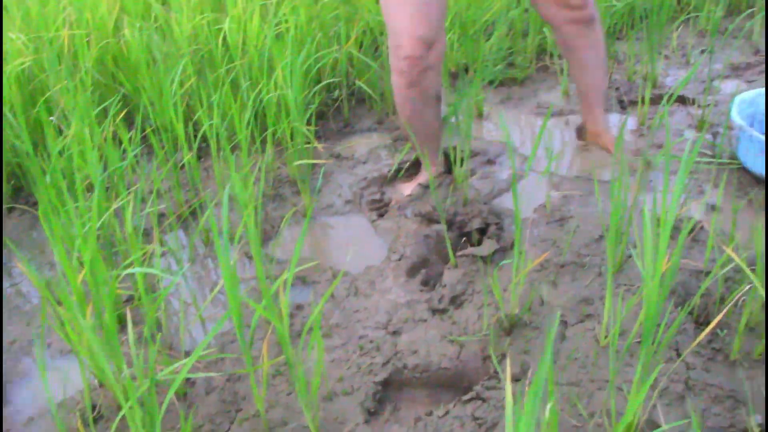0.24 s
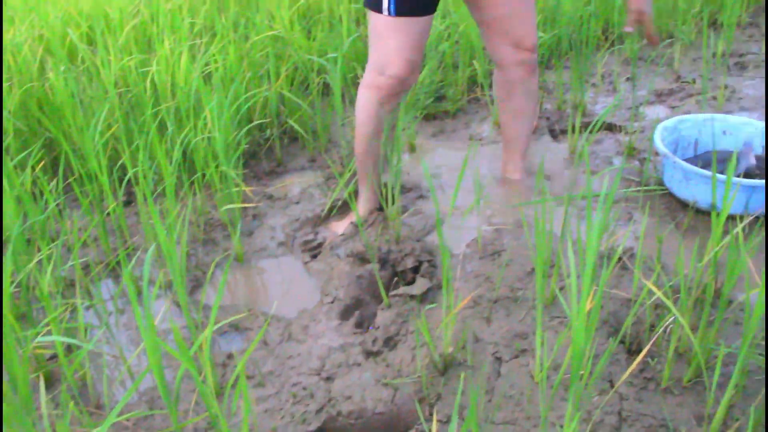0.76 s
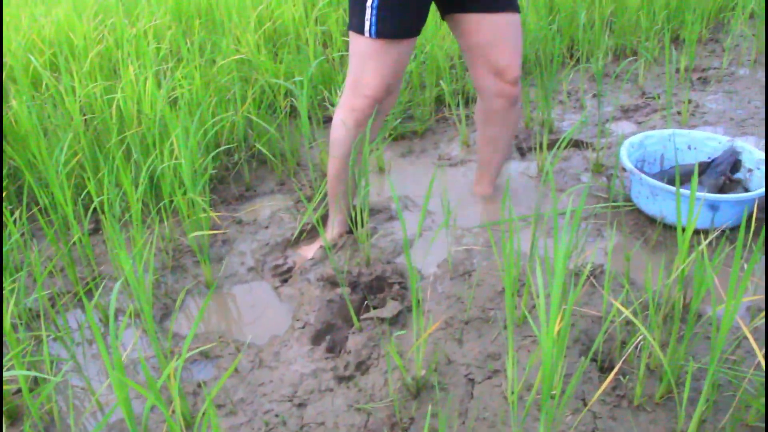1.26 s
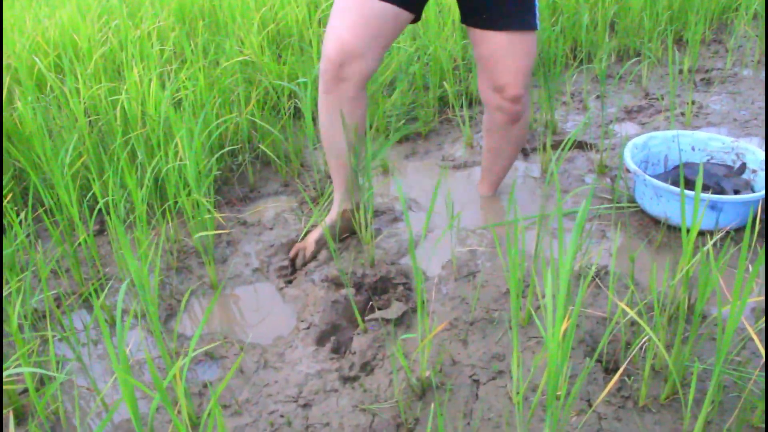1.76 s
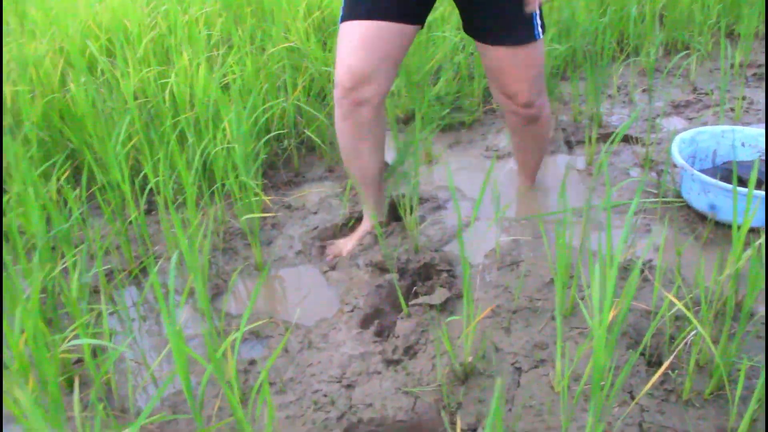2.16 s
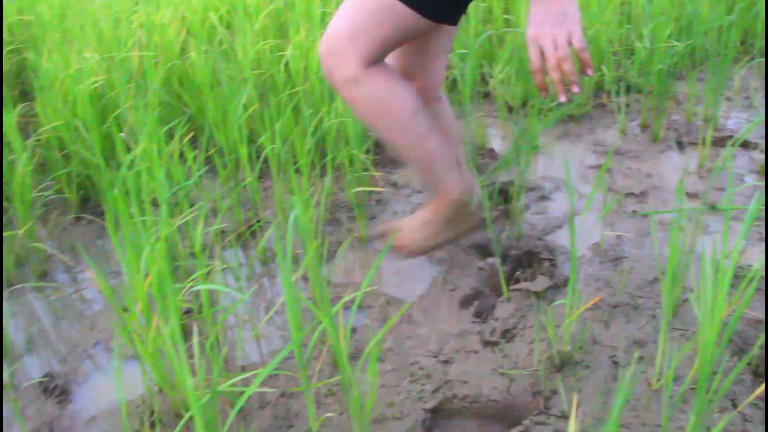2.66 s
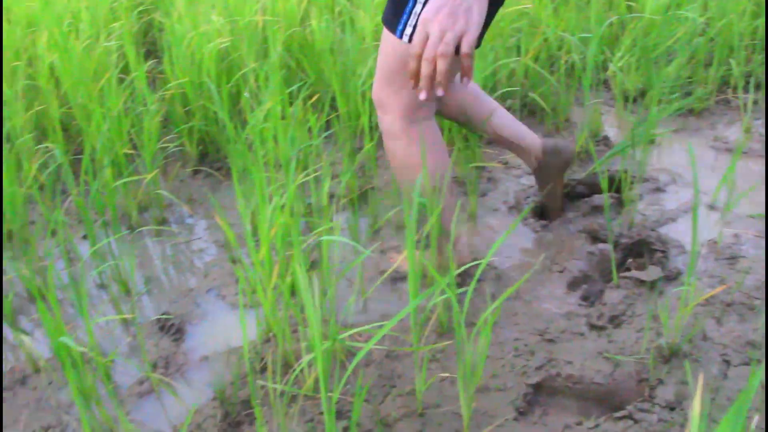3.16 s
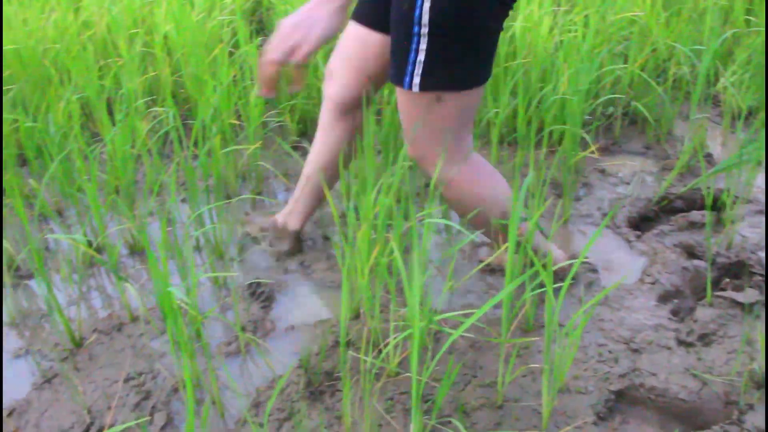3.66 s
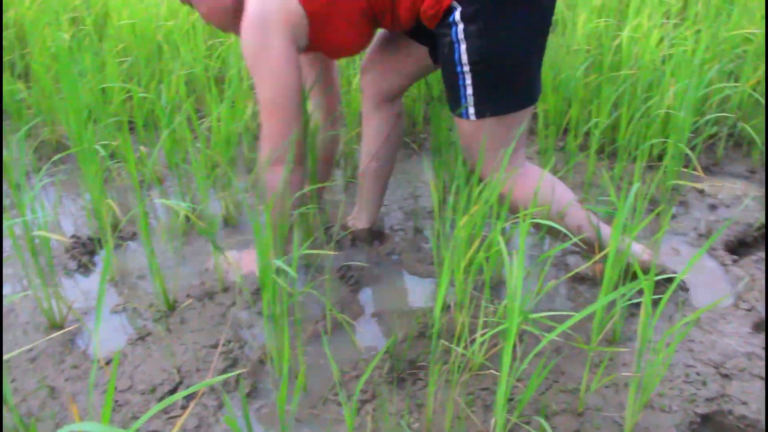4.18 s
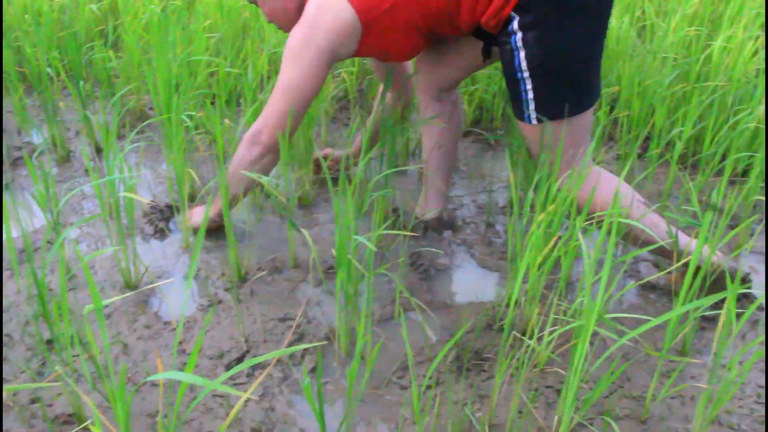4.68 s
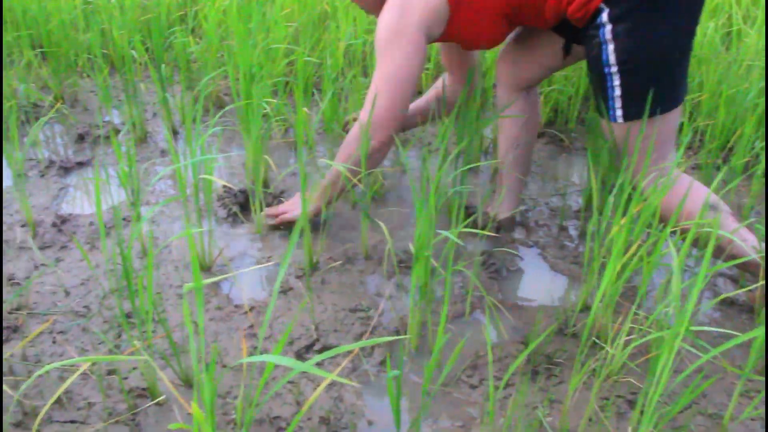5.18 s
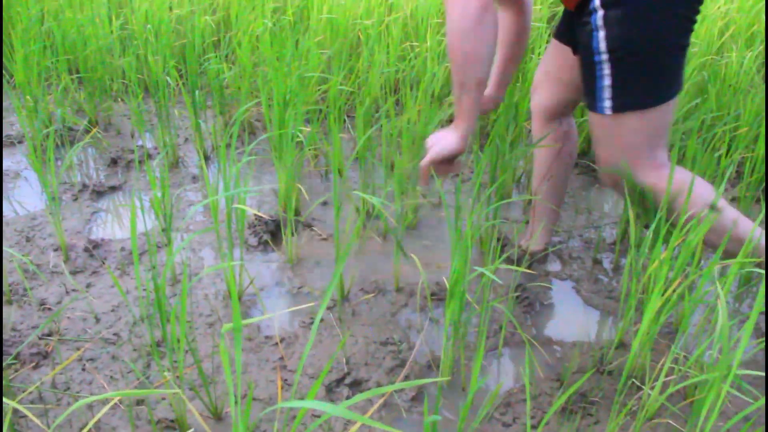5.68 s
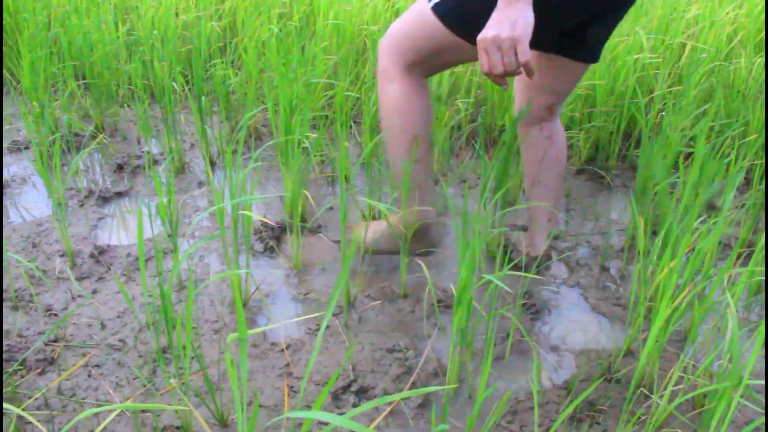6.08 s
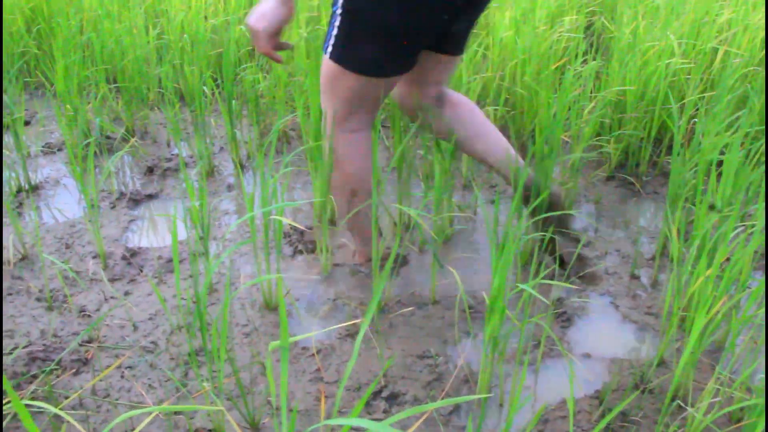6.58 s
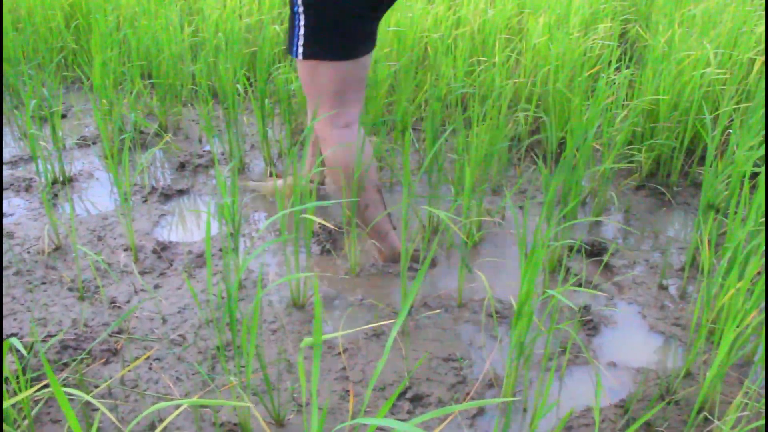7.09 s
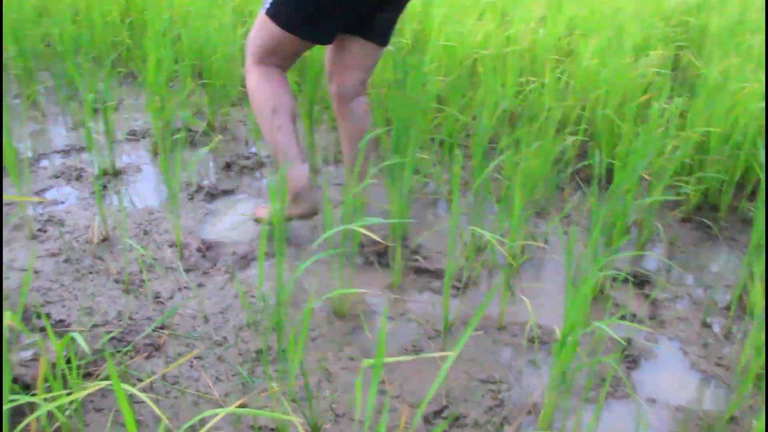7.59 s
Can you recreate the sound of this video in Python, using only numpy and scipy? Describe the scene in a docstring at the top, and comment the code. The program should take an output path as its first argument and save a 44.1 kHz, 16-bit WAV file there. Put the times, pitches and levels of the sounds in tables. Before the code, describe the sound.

Outdoors in a flooded field, irregular wet mud bursts, ringing bubbles and fine droplets follow each step and handful. Wet tearing clusters give way to quiet, a strong sucking pop, more quiet, then watery plops and sloshing. A quick squeaky air spurt precedes heavier splashing steps. The stereo pickup is close and dry, weighted right, over gentle rumble, hiss and sparse distant chirps.

```python
"""Wading in a flooded rice field

Someone wades barefoot, off to the right of the microphones, working the mud by hand: grain bursts squelch and tear.
Swelling swarms of ringing bubbles and snapping films slosh; single decaying tones make the larger pops and drips.
Late on, air squirts from under a foot as crackle through resonances, over two ringing pockets.
Far birds are raspy wavering tones with a blurred tail; the open air is coloured noise with a thin high whine."""
import sys
import numpy as np
from scipy import signal
from scipy.fft import rfft, irfft
from scipy.io import wavfile
from scipy.ndimage import uniform_filter1d

SR = 44100
rng = np.random.default_rng(int(sys.argv[2]) if len(sys.argv) > 2 else 0)


def waveform_to_disk(signal):
    """Save audio, clipped to [-1, 1], as 16-bit WAV at the path in sys.argv[1]."""
    frames = np.transpose(np.atleast_2d(signal))
    scaled = np.clip(frames, -1, 1) * 32767
    samples = np.round(scaled).astype(np.int16)
    wavfile.write(sys.argv[1], SR, samples)


N = 345744

# Levels of all water and mud sounds are taken before the common gain in field().
# Mud tearing or slapped [mid_swell_s, level_db, ring_t60_s, thud_db, spit_db]; squelches() offsets the last two
SQUELCH_EVENTS = [(.27, -31.5, .024, -14, 3), (.31, -42.5, 0.026, -17, 8), (.436, -38.5, 0.027, 5, -16),
                  (.68, -23.5, 0.025, 4.5, -9.5), (.762, -27, 0.015, 5, 3.5), (.828, -25.5, 0.06, 5.5, -4),
                  (0.851, -26, 0.067, 0, -6), (.89, -30, 0.018, 1, -25), (0.922, -39, .033, 9, -15),
                  (1.039, -33, .03, 3.5, -1.5), (1.086, -35, 0.026, -2, 5.5), (1.134, -42, 0.057, 13, -24),
                  (1.732, -45, 0.037, 11.5, -4), (1.862, -40.5, 0.03, 6, -13),
                  (2.065, -46, 0.045, 12.5, -4), (2.221, -37.5, 0.03, 13, 2), (2.237, -26, .016, 8, -10),
                  (2.253, -28, 0.02, 6, -8), (2.264, -29.5, .084, -1, -10), (2.3, -40.5, 0.017, -8, 6.5),
                  (2.3615, -16.5, 0.016, 8, -17.5), (2.505, -33, 0.041, -5, -20),
                  (2.552, -22, 0.02, -16, -12), (2.578, -29, 0.024, -4.5, -2.5),
                  (2.634, -31.5, 0.046, -2, -2.5), (2.706, -35, .027, -6, -6), (2.759, -40, .017, -16, 1.5),
                  (2.807, -43, 0.028, -14, 13), (2.826, -30.5, 0.067, -2, 1.5),
                  (2.888, -32.5, 0.068, -16, -8), (3.054, -45, 0.023, -12, 8), (3.737, -30, 0.049, -16, -3),
                  (3.753, -26, .027, -6.5, -25), (4.2127, -23.5, 0.02, -23, -7.5),
                  (4.229, -30.5, 0.019, -6, 1), (4.268, -22.5, .02, -16, -18),
                  (4.374, -36.5, 0.039, -11, 3.5), (4.776, -26.5, .023, -20, -2.5),
                  (4.7922, -27.5, .013, -30, 1), (4.941, -35, 0.027, -20, -25),
                  (4.968, -33, .03, -10, -1.5), (5.31, -29, 0.037, -1, -6), (5.325, -31, 0.038, -24, -1.5),
                  (5.383, -29, .032, -13, -9), (5.459, -33, 0.037, 5.5, -7), (6.012, -41.5, 0.045, 13, -12),
                  (6.425, -33, 0.023, -10, -6), (6.558, -20, .021, -1.5, -10),
                  (6.569, -18.5, 0.031, -2.5, -11.5), (7.107, -32.5, .014, 0, 6),
                  (7.361, -33, .025, -17, -5), (7.379, -37, 0.041, 9.5, 5.5), (7.43, -23, 0.0082, -3, -8.5),
                  (7.712, -34, 0.019, -12, -11), (7.718, -31.5, 0.073, -14, 4.5),
                  (7.794, -30.5, 0.069, -18, -19)]
# Single large air pockets and drips [start_s, level_db, starting_pitch_hz]
LARGE_BUBBLES = [(.683, -21, 2930), (.763, -32, 840), (.853, -31, 833), (.856, -11, 4670),
                 (2.239, -29, 4400), (2.254, -26, 4350), (2.272, -20, 1670), (2.3618, -17, 1026),
                 (2.38, -28, 2800), (2.483, -32, 1110), (2.507, -19.5, 807), (2.552, -25, 3850),
                 (2.578, -30, 1520), (2.634, -16.5, 2410), (2.66, -30, 3980), (3.019, -37, 2110),
                 (3.947, -31, 1180), (3.974, -35, 1726), (4.279, -20, 3000), (4.288, -31, 1100),
                 (4.374, -29, 1380), (4.411, -22, 1630), (4.44, -26, 1250), (4.778, -21, 1730),
                 (4.7905, -7, 1910), (4.907, -25, 1700), (5.045, -33, 1100), (5.171, -34, 1460),
                 (5.476, -25.5, 1216), (5.506, -30, 1320), (5.52, -29, 1200), (6.245, -27.5, 990),
                 (6.291, -26, 4830), (6.311, -31, 1026), (6.383, -36.5, 933), (6.447, -42, 800),
                 (6.565, -23.5, 840), (6.675, -35, 745), (6.681, -30, 2400), (6.769, -22.5, 1130),
                 (7.198, -33, 1250), (7.323, -29.5, 1790), (7.39, -28.5, 770), (7.403, -24, 900),
                 (7.427, -20, 1315), (7.727, -24, 840), (7.793, -17.5, 1660)]
# A foot or hand moves through water, which then washes back
# [peak_s, fade_t60_s, bubbling_db, bubble_pitch_hz, spray_db, backwash_delay_s, backwash_relative_db]
SLOSH_EVENTS = [(.28, 0.094, -56, 2500, -41, 0.041, -22), (.85, 0.065, -48, 1380, -43, 0.17, -14),
                (2.18, 0.24, -44, 480, -53.5, 0.05, -1.5), (2.471, 0.44, -40, 2090, -51, 0.072, 1),
                (2.84, 0.38, -54, 2000, -45.5, 0.082, -9), (3.75, 0.15, -45.5, 1550, -49, .1, -16),
                (4.241, 0.13, -58, 2200, -41, 0.29, -14), (4.3, .62, -43.5, 1514, -53, 0.15, -0.5),
                (4.93, 0.28, -41.5, 1660, -58, 0.13, -25), (5.399, 0.78, -43, 1670, -49.5, 0.078, -4),
                (5.94, 0.82, -61, 1200, -52.5, .06, -5), (6.575, 0.26, -38, 1320, -44.5, 0.11, -1.5),
                (7.099, 0.28, -47.5, 1870, -42.5, 0.21, -10), (7.39, 0.31, -34.5, 1256, -43, .065, -8.5),
                (7.729, 0.19, -36, 1500, -40, 0.078, -8.5)]
# Air and slurry forced out from under a foot in spurts [peak_s, lower_pocket_db, upper_pocket_db]
SPURT_EVENTS = [(6.2434, -16, -12.5), (6.25, -25, -13), (6.2948, -14.5, -28), (6.312, -17, -16.5),
                (6.3318, -18, -19), (6.341, -13.5, -20)]
# Resonances of the gap under the sole [pitch_hz, width_hz, relative_db]
SOLE_GAP_MODES = [(1850, 340, 3), (2490, 155, 12), (2680, 200, -8), (2990, 43, 0), (4530, 600, -6),
                  (5400, 510, -6), (6150, 260, -2), (8400, 1500, -51)]
# Far birds [start_s, pitch_hz, right_level_db, roughness_0_to_1, left_minus_right_db]
BIRD_CHIRPS = [(.023, 3370, -53.5, 0.7, -6), (.497, 3510, -57, .7, -3), (1.195, 2920, -47, 0.52, -7),
               (1.41, 3080, -44, 0.4, -3), (1.621, 2980, -42, 0.9, -6.5), (1.824, 2900, -54, 0.53, -5),
               (5.006, 3250, -39, 0.53, -23), (5.211, 3355, -37.5, 0.19, -21),
               (5.621, 2826, -40, 0.96, -17)]
# Colour of the thud down in the mud [frequency_hz, relative_db_per_hz]
THUD_COLOUR = [(80, -15), (200, -4.5), (330, 2.5), (600, -5), (1000, -4.5), (2500, -53)]
# Colour of the smack at the mud's surface [frequency_hz, relative_db_per_hz]
SMACK_COLOUR = [(300, -21), (700, -7), (1000, 3), (1800, 10.5), (3100, 4.5), (4200, -4), (8000, -51)]
# Colour of the spit of fine drops [frequency_hz, relative_db_per_hz]
SPIT_COLOUR = [(1500, -25), (3000, -1.5), (4500, 5.5), (6000, -2), (8000, -1), (11000, -7), (16000, -22)]
# Colour of spray over the water [frequency_hz, relative_db_per_hz]
SPRAY_COLOUR = [(300, 2), (900, -7.5), (2500, -0.5), (5000, 0.5), (7500, 1), (11000, -2), (16000, -17)]
# Colour of the open air [frequency_hz, relative_db_per_hz]
AIR_COLOUR = [(20, -42), (45, -13.5), (80, -1.5), (150, 2), (280, -7.5), (500, -13.5), (1250, -16),
              (1500, -14), (2500, -17.5), (3500, -17.5), (6200, -27.5), (9000, -30.5), (15500, -40.5)]
# Stereo balance of the open air [frequency_hz, left_minus_right_db]
AIR_LEFT_BALANCE = [(20, -26), (80, -4), (170, -13.5), (380, -6), (1000, -4), (1500, -8), (3000, -6),
                    (8000, -4), (15000, -2.5)]
# Stereo balance of the wader's direct sound, before the bearing [frequency_hz, left_minus_right_db]
WADER_LEFT_BALANCE = [(100, -2.5), (350, -25), (600, -46), (1200, -20.5), (2400, -14), (5000, -9.5),
                      (9000, -12.5), (15000, -7)]
# How alike the air is at both sides [frequency_hz, likeness_minus_1_to_1]
AIR_SIDE_LIKENESS = [(60, 0.87), (130, -0.011), (290, -0.33), (640, -0.39), (1400, 0.01), (15000, -0.03)]
# Where the wader is [time_s, shift_towards_left_db]
WADER_BEARING = [(.3, -5), (.8, -13.5), (2.3, -3), (2.6, -5.5), (3.7, 2), (4.4, 1.5), (4.8, 2.5), (5.4, 0),
                 (6.3, 1), (6.6, -5.5), (7.4, 1.5), (7.8, 1.5)]
# Faint bubbling of the disturbed puddles [time_s, level_db]
TRICKLE_LEVELS = [(0, -68.5), (1.05, -58.5), (1.5, -64.5), (2.3, -60), (2.7, -57.5), (3.4, -66.5),
                  (4.05, -56.5), (4.6, -58.5), (5.6, -59), (6.1, -64), (6.7, -60), (6.97, -69), (7.3, -51),
                  (7.8, -59.5)]

AIR_DB = -46
WHINE_HZ, WHINE_WIDTH_HZ, WHINE_DB = 7540, 450, -66
CUTOFF_HZ = 15900
TIME = np.arange(SR * 6 // 10) / SR   # seconds
CHIRP_S, CHIRP_WAVER_HZ = 0.053, 380   # waver at full roughness
PUSH_SWELL_S, BACKWASH_SWELL_S, BACKWASH_FADE_S = 0.04, 0.09, 0.43
# The mud ticks as it closes after a tear
TICK_DB, TICK_SPREAD_DB, TICK_T60_S, TICK_WITHIN_S, TICK_SPIT_DB = -42, 3, 0.0136, 0.14, 0
# A usual bubble rings this many cycles; harder ones burst sooner (dB of ring time per dB of level)
BUBBLE_CYCLES, USUAL_BUBBLE_DB, BURST_DAMPING = 33.4, -24.5, 0.51
LONGEST_RING_S = 0.065   # mud damps even the gentlest bubble
# The heel comes free and the hollow under it rings
HEEL_S, HEEL_DB, HEEL_HZ, HEEL_T60_S = 2.3617, -12, 599, 0.059
LOWER_POCKET_HZ, UPPER_POCKET_HZ, POCKET_SCATTER = 2408, 3115, 0.02   # scatter as a share of pitch
FLUTTER_S, FLUTTER_DB = 0.004, -8.5   # the gap flaps open once more after each spurt


def from_db(db):
    """Decibels to gain."""
    return 10 ** (np.asarray(db) / 20)


def rms_one(x):
    """Scale to rms 1."""
    return x / np.sqrt(np.mean(x ** 2) + 1e-20)


def fade(t, t60):
    """Exponential decay, 60 dB down after t60."""
    return np.exp(-np.log(1000) * t / t60)


def surge(t, swell, t60, depth_db=24):
    """Grows by depth_db over the swell time, then dies away."""
    growth = from_db(depth_db * np.minimum(t / swell - 1, 0))
    return np.minimum(growth, fade(np.maximum(t - swell, 0), t60))


def add(track, s, sound):
    """Mix a sound in from time s on."""
    start = max(int(s * SR), 0)
    part = sound[:max(N - start, 0)]
    track[start:start + len(part)] += part


def over_time(points):
    """A (s, value) table read at every sample of the scene."""
    return np.interp(np.arange(N) / SR, *np.transpose(points))


def per_bin(points, size):
    """A (Hz, value) table read at every bin of a spectrum."""
    hz, value = np.transpose(points)
    return np.interp(np.log(np.fft.rfftfreq(size, 1 / SR) + 1), np.log(hz), value)


def colour(x, spectrum):
    """Causal (minimum-phase) filter that leaves the power of white noise unchanged."""
    size = x.shape[-1]
    gain = rms_one(from_db(per_bin(spectrum, size)))
    cepstrum = irfft(np.log(gain), size)
    # folding the cepstrum forward makes the filter minimum-phase
    cepstrum[1:size // 2] *= 2
    cepstrum[size // 2 + 1:] = 0
    return irfft(rfft(x) * np.exp(rfft(cepstrum)), size)


def resonate(x, hz, width_hz):
    """One resonance with gain 1 on top."""
    r = np.exp(-np.pi * width_hz / SR)
    feed = np.array([1, 0, -1]) * (1 - r * r) / 2
    return signal.lfilter(feed, [1, -2 * r * np.cos(2 * np.pi * hz / SR), r * r], x)


def crackle(per_s, spread_db, size):
    """Tiny wet films snapping at random; a positive spread makes a few louder, a negative one quieter; rms 1."""
    strengths = from_db(spread_db * np.minimum(rng.exponential(1, size), 4))
    snaps = strengths * rng.choice([-1, 1], size)
    return rms_one(snaps * (rng.random(size) < per_s / SR))


def bubble(t, hz, t60, rise, cycles_in=0.61):
    """A ringing air pocket; its pitch climbs as it nears the surface."""
    tone = np.sin(2 * np.pi * hz * t * (1 + rise * t / t60))
    return tone * fade(t, t60) * (1 - np.exp(-t * hz / cycles_in))


def froth(hz, octaves, cycles, spread_db, span, count, size):
    """A swarm of count small bubbles over span samples, with pitches scattered around hz; rms 1."""
    born = ((np.arange(count) + rng.uniform(0, 2, count)) * span / count).astype(int)[:, None]
    pitch, strength, damping = np.clip(rng.standard_normal((3, count, 1)), -2, 2)
    pitches = np.minimum(hz * 2 ** (octaves * pitch), CUTOFF_HZ)
    t60 = cycles / pitches * from_db(3 * damping)
    rings = from_db(spread_db * strength) * bubble(TIME[:size], pitches, t60, rise=0.16)
    places = born + np.arange(size)
    return rms_one(np.bincount(places.ravel(), rings.ravel(), span)[:span])


def air():
    """Far rumble and soft hiss, partly alike at both sides, with a thin high whine of resonant noise."""
    mid, side = rfft(colour(rng.standard_normal((2, N)), AIR_COLOUR))
    alike = np.clip(per_bin(AIR_SIDE_LIKENESS, N), -1, 1)
    shared = np.sqrt(1 + alike) * mid
    opposed = np.sqrt(1 - alike) * side * [[1], [-1]]
    pair = (shared + opposed) / np.sqrt(2)
    whine = rms_one(resonate(rng.standard_normal((2, N)), WHINE_HZ, WHINE_WIDTH_HZ))
    left, right = from_db(AIR_DB) * pair + from_db(WHINE_DB) * rfft(whine)
    return irfft(np.array([left * from_db(per_bin(AIR_LEFT_BALANCE, N)), right]), N)


def trickle(bubble_hz=1550):
    """Small bubbles keep rising wherever the water has been disturbed."""
    swarm = froth(bubble_hz, octaves=0.463, cycles=21.3, spread_db=3.0, span=N, count=2200, size=1024)
    return from_db(over_time(TRICKLE_LEVELS)) * swarm


def bird(echo_db=-4, echo_t60=0.38):
    """Short chirps, raspy from a random waver in pitch, blurred by distance into a decaying tail."""
    left, right = np.zeros((2, N))
    for s, hz, db, rough, left_db in BIRD_CHIRPS:
        waver = rms_one(uniform_filter1d(rng.standard_normal(len(TIME)), size=40))
        phase = 2 * np.pi * np.cumsum(hz + rough * CHIRP_WAVER_HZ * waver) / SR
        swell_and_fall = np.sin(np.pi * np.minimum(TIME / CHIRP_S, 1))
        chirp = from_db(db) * np.sin(phase) * swell_and_fall
        add(right, s, chirp)
        add(left, s, from_db(left_db) * chirp)
    tails = rng.standard_normal((2, len(TIME))) * fade(TIME, echo_t60)
    echoes = [signal.fftconvolve(side, tail / np.linalg.norm(tail))[:N]
              for side, tail in zip((left, right), tails)]
    return np.array([left, right]) + from_db(echo_db) * np.array(echoes)


def waves():
    """Each movement makes a quick push of water and a slower backwash."""
    rows = []
    for s, t60, bubbling_db, hz, spray_db, after, back_db in SLOSH_EVENTS:
        rows.append((s, PUSH_SWELL_S, t60, bubbling_db, hz, spray_db))
        rows.append((s + after, BACKWASH_SWELL_S, BACKWASH_FADE_S, bubbling_db + back_db, hz, spray_db + back_db))
    return rows


def sloshes(drop_hz=3300, drop_cycles=17, snap_db=-7):
    """Water swells around a foot or hand and settles: bubbles below, pinging droplets and snapping films on top."""
    out, span = np.zeros(N), len(TIME)
    for s, swell, t60, bubbling_db, hz, spray_db in waves():
        # thick water moves in gulps of about a hundredth of a second
        gulping = rms_one(uniform_filter1d(rng.standard_normal(span), size=400))
        gulps = from_db(3 * np.clip(gulping, -2, 1.5))
        swarm = froth(hz, octaves=0.435, cycles=20.5, spread_db=3.5, span=span, count=380, size=768)
        # the bubbling carries little sound below half its usual pitch
        shallow = signal.butter(2, hz / 2, "high", fs=SR, output="sos")
        bubbling = from_db(bubbling_db) * signal.sosfilt(shallow, swarm)
        drops = froth(drop_hz, octaves=0.677, cycles=drop_cycles, spread_db=3.0, span=span, count=480, size=384)
        snaps = from_db(snap_db) * crackle(per_s=5900, spread_db=-10, size=span)
        spray = from_db(spray_db) * rms_one(colour(drops + snaps, SPRAY_COLOUR))
        add(out, s - swell, surge(TIME, swell, t60) * gulps * (bubbling + spray))
    return out


def tears():
    """Every squelch, and a small tick that follows it at random."""
    rows = list(SQUELCH_EVENTS)
    chances = rng.random((len(SQUELCH_EVENTS), 2))
    for (s, db, t60, thud_db, _), (late, strength) in zip(SQUELCH_EVENTS, chances):
        # a tick stays well below its tear
        tick_db = min(TICK_DB + TICK_SPREAD_DB * (2 * strength - 1), db - 12.5)
        rows.append((s + t60 + TICK_WITHIN_S * late, tick_db, TICK_T60_S, thud_db, TICK_SPIT_DB))
    return rows


def squelches(swell_share=0.13, spit_hz=5200, size=8192):
    """Each squelch is a burst of snaps: a thud in the mud, a smack at its surface, a spit of fine drops."""
    out, t = np.zeros(N), TIME[:size]
    for s, db, t60, thud_db, spit_db in tears():
        swell = swell_share * t60   # short snaps start hard, long tears softly
        shape = surge(t, swell, t60)
        thud, smack, snaps = [crackle(per_s=7000, spread_db=1.5, size=size) for _ in range(3)]
        drops = froth(spit_hz, octaves=0.464, cycles=13, spread_db=-1.0, span=size, count=300, size=256)
        parts = [(thud, THUD_COLOUR, thud_db - 11.0),
                 (smack, SMACK_COLOUR, -5),
                 (snaps + drops, SPIT_COLOUR, spit_db - 8)]
        sound = sum(from_db(part_db) * rms_one(colour(grains * shape, tone)) for grains, tone, part_db in parts)
        strength = from_db(db) * np.sqrt(np.mean(shape ** 2))
        add(out, s - swell / 2, strength * sound)
    return out


def plops(rise=0.12):
    """The large bubbles, one by one, and the pop of the heel; small or hard-bursting pockets ring shortest."""
    out, t = np.zeros(N), TIME[:SR // 8]
    for s, db, hz in LARGE_BUBBLES:
        ring_s = BUBBLE_CYCLES / hz * from_db(BURST_DAMPING * (USUAL_BUBBLE_DB - db))
        add(out, s, from_db(db) * bubble(t, hz, min(ring_s, LONGEST_RING_S), rise))
    add(out, HEEL_S, from_db(HEEL_DB) * bubble(t, HEEL_HZ, HEEL_T60_S, rise=0.061))
    return out


def squirts(leak_s=0.0028, rush_db=-27, ring_db=-20, ring_t60=0.11, pocket_db=-2, muffle_hz=8200, size=8192):
    """Air spurts out from under the sole: each rushes through the narrow gap and rings two small pockets."""
    out, t = np.zeros(N), TIME[:size]
    flaps = [(s + FLUTTER_S, lower_db + FLUTTER_DB, upper_db + FLUTTER_DB)
             for s, lower_db, upper_db in SPURT_EVENTS]
    for s, lower_db, upper_db in list(SPURT_EVENTS) + flaps:
        gains = from_db([lower_db, upper_db])
        scatter = 1 + POCKET_SCATTER * rng.standard_normal(2)
        pitches = np.array([LOWER_POCKET_HZ, UPPER_POCKET_HZ]) * scatter
        spurt = surge(t, leak_s, 0.011)
        lingering = from_db(ring_db) * surge(t, leak_s, ring_t60)
        flow = crackle(per_s=7900, spread_db=-1.0, size=size) * (spurt + lingering)
        rush = rms_one(sum(from_db(mode_db) * resonate(flow, mode_hz, width)
                           for mode_hz, width, mode_db in SOLE_GAP_MODES))
        pockets = gains @ np.sin(2 * np.pi * np.outer(pitches, t)) * spurt
        add(out, s - leak_s, np.linalg.norm(gains) * from_db(rush_db) * rush + from_db(pocket_db) * pockets)
    return signal.sosfilt(signal.butter(3, muffle_hz, fs=SR, output="sos"), out)


def field(x, scatter_db=-17, scatter_t60=0.056, left_scatter_db=-21, build_s=0.008):
    """The wader moves about on the right; water and rice stalks scatter a short faint tail to both sides."""
    t = TIME[:SR // 4]
    tails = rng.standard_normal((2, len(t))) * fade(t, scatter_t60) * (1 - np.exp(-t / build_s))
    left_tail, right_tail = [signal.fftconvolve(x, tail / np.linalg.norm(tail))[:N] for tail in tails]
    balanced = irfft(rfft(x) * from_db(per_bin(WADER_LEFT_BALANCE, N)), N)
    left = from_db(over_time(WADER_BEARING)) * balanced + from_db(left_scatter_db) * left_tail
    right = x + from_db(scatter_db) * right_tail
    return from_db(5.5) * np.array([left, right])


def scene():
    """The wader in the open field, with far birds and the air around."""
    wader = trickle() + sloshes() + squelches() + plops() + squirts()
    return air() + bird() + field(wader)


def record(dry):
    """The top is cut steeply, forwards and backwards so that nothing is delayed."""
    return signal.sosfiltfilt(signal.ellip(10, 0.05, 70, CUTOFF_HZ, fs=SR, output="sos"), dry)


dry = scene()
out = record(dry)
waveform_to_disk(out)
```